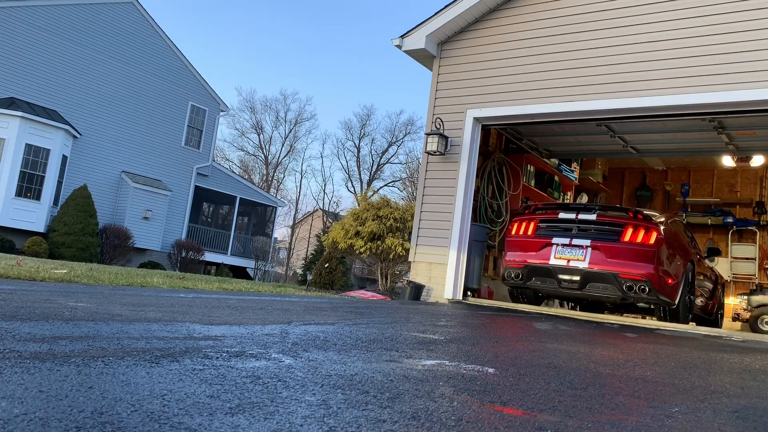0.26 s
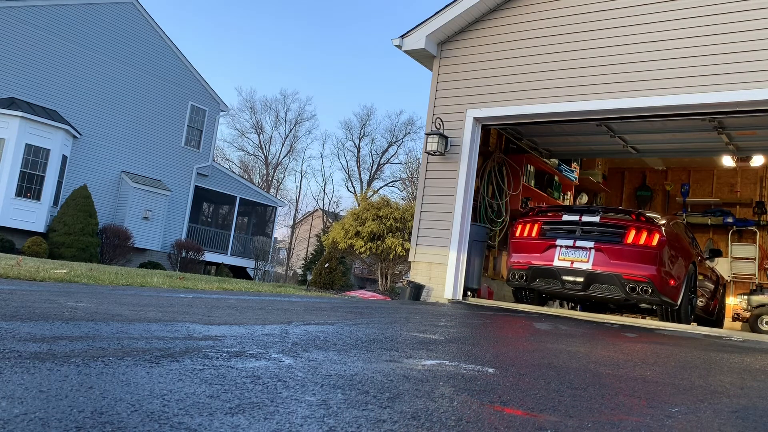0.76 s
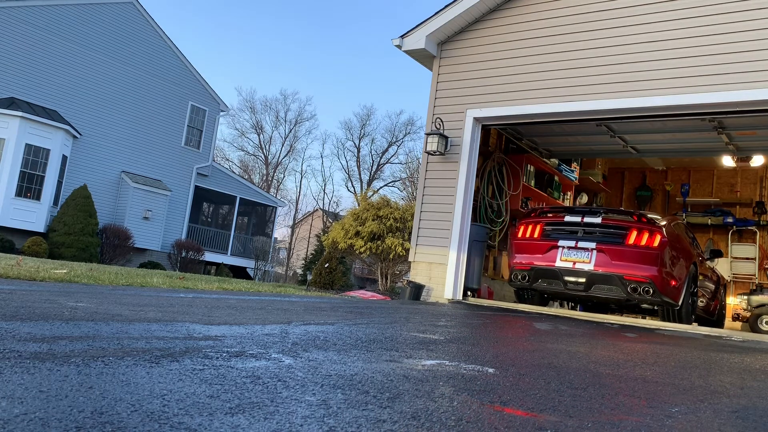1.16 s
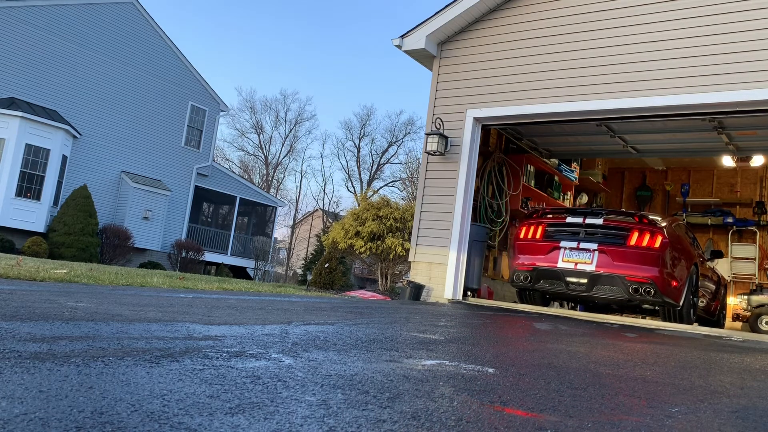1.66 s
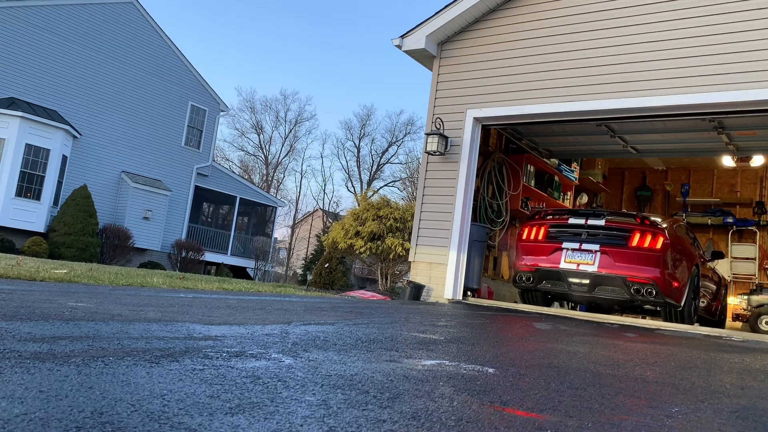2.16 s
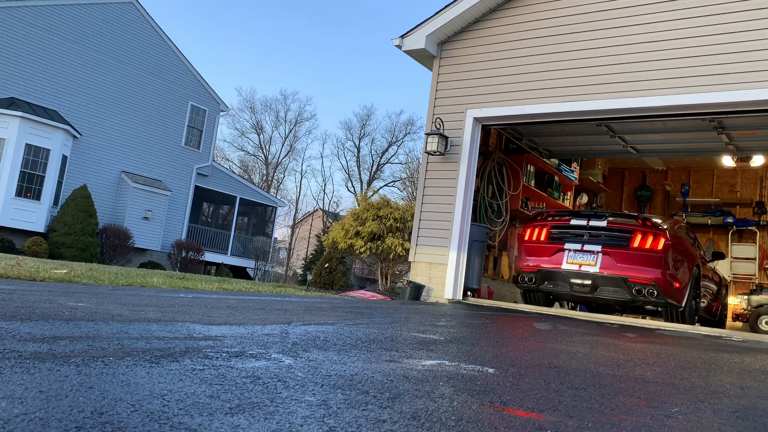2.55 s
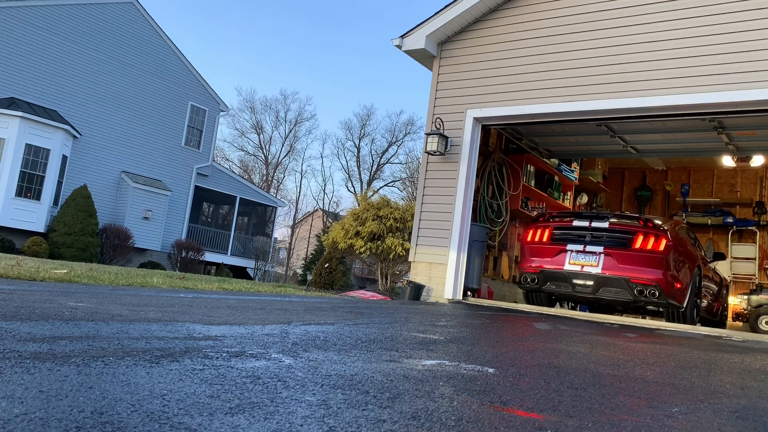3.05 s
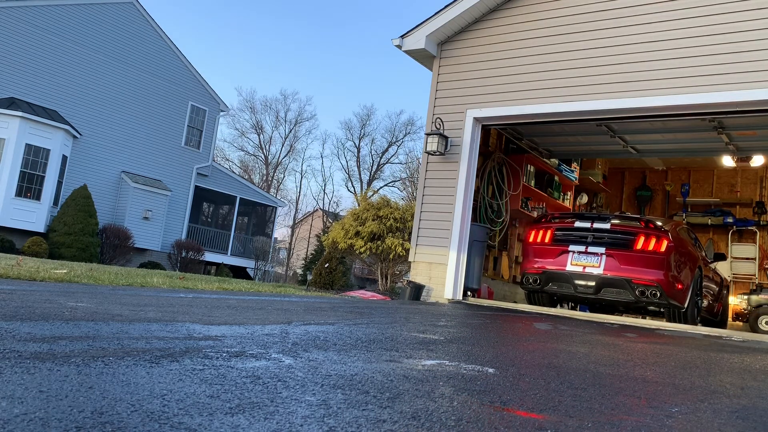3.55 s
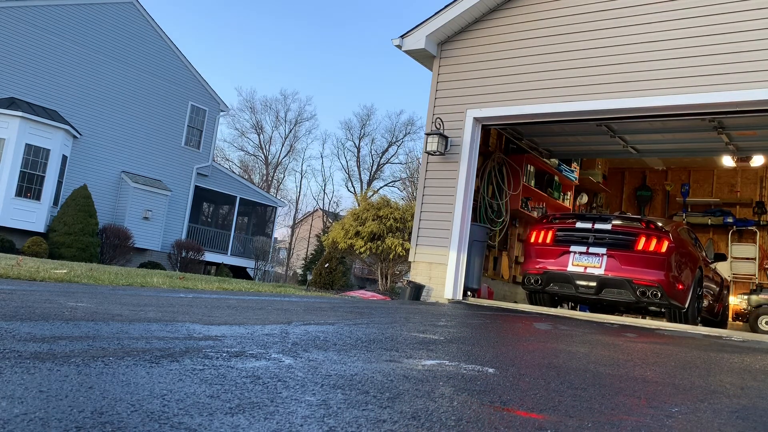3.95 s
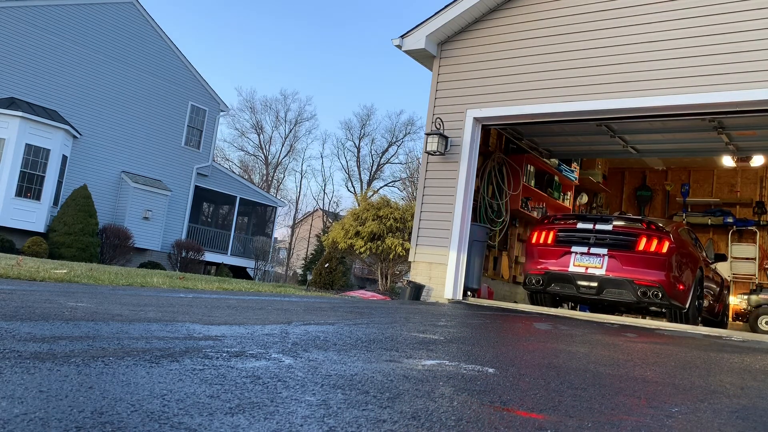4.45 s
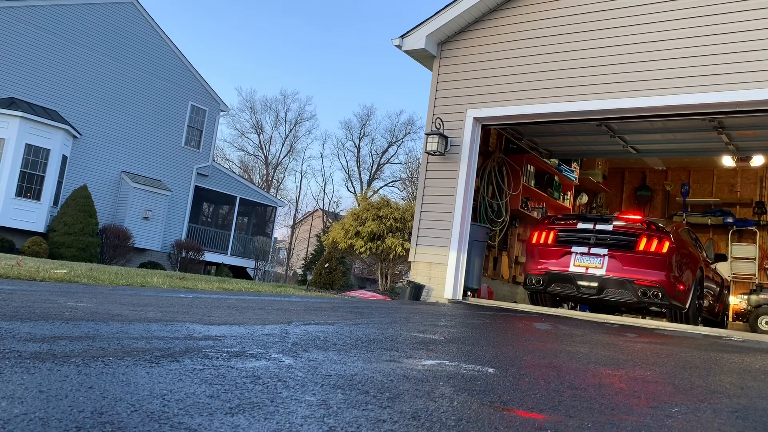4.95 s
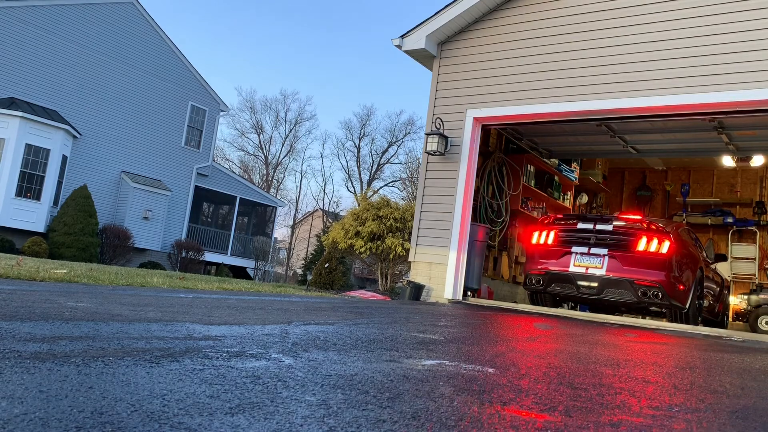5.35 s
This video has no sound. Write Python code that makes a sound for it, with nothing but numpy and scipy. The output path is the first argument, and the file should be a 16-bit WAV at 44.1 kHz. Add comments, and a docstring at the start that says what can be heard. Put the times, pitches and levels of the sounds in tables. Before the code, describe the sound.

Throaty V8 exhaust rumbles from an open garage, two throttle blips crackle, then an uneven idle continues over steady fan whir.

```python
"""A V8 car creeps out of an open garage: its revs fall, the throttle blips twice with pops in the pipe,
then it settles to a lumpy idle. Uneven firings ring the pipes, the tailpipe and the garage air.
From the start a cooling fan whirs with throbbing whistles and nears, over a street's low hum.
A loose part buzzes harder as the rasp rises; a phone hears it all through two ports."""
import sys
import numpy as np
from scipy import signal
from scipy.fft import rfft, irfft, next_fast_len
from scipy.io import wavfile
from scipy.ndimage import uniform_filter1d

SR = 44100
rng = np.random.default_rng(int(sys.argv[2]) if len(sys.argv) > 2 else 0)


def digitize_waveform(pressure):
    """Quantize a signal to 16-bit integers and store it at the path in sys.argv[1].

    Rows of a 2-D input are taken as channels; values are limited to [-1, 1].
    """
    field = np.atleast_2d(pressure).T
    bounded = np.clip(field, -1, 1)
    quanta = np.round(bounded * 32767).astype(np.int16)
    wavfile.write(sys.argv[1], SR, quanta)


N = 246519
TIME = np.arange(N) / SR
RUN_IN = SR // 3  # samples of mirrored sound that set resonances and echoes going before the start
BUILD_UP_S = 0.023  # the gas leads the ringing that it builds up


def undb(db):
    """dB to gain."""
    return 10 ** (np.asarray(db) / 20)


def level(x, db):
    """Scale to an rms level."""
    return x * undb(db) / np.sqrt(np.mean(x ** 2))


def follow(table, at):
    """Straight-line automation: every column after the first, read at the given positions."""
    points, *columns = np.transpose(table)
    return [np.interp(at, points, column) for column in columns]


def ring(x, modes):
    """Steep resonances (each applied twice) of alternating sign."""
    x = np.pad(x, (RUN_IN, 0), "reflect")
    out = 0
    for k, (hz, width_hz, db) in enumerate(modes):
        b, a = signal.iirpeak(hz, hz / width_hz, SR)
        rung = signal.lfilter(b, a, signal.lfilter(b, a, x))
        out = out + (-1) ** k * undb(db) * rung
    return out[RUN_IN:]


def driven(x, db, modes):
    """Resonances rung by a drive whose strength changes, so they build up and ring out."""
    return ring(x * undb(db), modes) / np.std(ring(x, modes))


def coloured(spectrum):
    """Noise of rms 1 with the given spectrum."""
    hz, db = np.transpose(spectrum)
    log_hz = np.log(np.fft.rfftfreq(N, 1 / SR) + 1)
    shape = undb(np.interp(log_hz, np.log(hz), db, -90, -90))
    return level(irfft(rfft(rng.standard_normal(N)) * shape, N), 0)


def walk(rate_hz):
    """Random levels held 1 / rate s and slewed twice; spread near 1."""
    hold = int(SR / rate_hz)
    steps = np.repeat(rng.standard_normal(N // hold + 1), hold)
    return 1.46 * uniform_filter1d(uniform_filter1d(steps, hold), hold)[:N]


def puffs(clicks, decay_s):
    """Envelope that jumps at each click and dies away."""
    return signal.lfilter([1], [1, -np.exp(-1 / (decay_s * SR))], clicks)


def street_hum():
    """Low street noise, nearly the same at both ears."""
    # street spectrum: pitch_hz [Hz], density_db [dB per Hz, relative]
    street_spectrum = [(15, -33), (25, -18), (42, -8.5), (66, -3.5), (113, -26), (192, -18.5), (338, -25),
                       (528, -40), (659, -41), (730, -51), (1500, -51), (1950, -85), (3300, -120)]
    each_ear = np.array([coloured(street_spectrum), coloured(street_spectrum)])
    return level(each_ear * 0.07 + coloured(street_spectrum), -42.5)


def firings(fired, rough, scatter_db, jitter):
    """One click per cylinder, with its own strength and timing plus chance that grows with roughness."""
    # the cylinders in firing order: strength_db [dB], late [share of a firing gap]
    cylinders = [(5.5, 0.0185), (2.4, 0.107), (-1, 0.0157), (5.26, -0.1016), (2.8, -0.015), (1.4, 0.087),
                 (4.5, -0.0092), (3.5, -0.1058)]
    k = np.arange(1, int(fired[-1]))
    chance = rng.standard_normal((len(k), 2)) * np.interp(k, fired, rough)[:, None]
    strength_db, late = np.array(cylinders)[k % 8].T
    at = np.interp(k + late + jitter * chance[:, 0], fired, np.arange(N)).astype(int)
    clicks = np.zeros(N)
    clicks[at] = undb(strength_db + scatter_db * chance[:, 1])
    return clicks


def boom(hz, fired, load_db):
    """Pure tone at the firing rate, lifted by the garage air and trailing the firings as revs rise."""
    # how much the garage lifts the boom: firing_rate_hz [Hz], lift_db [dB over the load]
    garage_lift = [(44, -2), (46, 0.5), (48, 1.5), (49.5, 9.5), (51, 16), (53, 20.5), (55.5, 18),
                   (57, 13.5), (60, 5), (63, -3), (67, 8.5), (70, 5), (73, 8)]
    lag_rad_per_hz, in_step_hz = .031, 48
    garage_swell_s = 0.019  # the garage air takes this long to follow
    lift_db, = follow(garage_lift, hz)
    swell = uniform_filter1d(undb(load_db + lift_db), int(garage_swell_s * SR))
    lag = lag_rad_per_hz * (hz - in_step_hz)
    return swell * np.sqrt(2) * np.cos(2 * np.pi * fired - lag)


def lope(drive, pops):
    """Garage air modes rung by the uneven beat between firings, and thumped by the pops."""
    # garage air modes: pitch_hz [Hz], width_hz [Hz, of one pass], level_db [dB, relative]
    garage_modes = [(54, 6.7, 2), (62.3, 6, 7), (78.7, 15.7, -4)]
    # ride of the uneven lope: start_s [s], level_db [dB]
    lope_ride = [(0, -35), (.35, -49), (.55, -53), (1.3, -46), (1.45, -48), (2.5, -36), (2.7, -32),
                 (2.9, -56.5), (3.25, -44.5), (3.4, -31.5), (3.8, -33), (4.0, -35), (4.4, -25.5),
                 (4.6, -46), (5.3, -36.5), (5.45, -33.5), (5.59, -53)]
    lope_db, = follow(lope_ride, TIME + BUILD_UP_S)
    pop_thump_db = -46.5
    return driven(drive, lope_db, garage_modes) + driven(pops, pop_thump_db, garage_modes)


def pipe_growl(drive, growl_db):
    """Exhaust pipe and garage resonances rung by the firings."""
    # pipe and garage resonances: pitch_hz [Hz], width_hz [Hz, of one pass], level_db [dB, relative]
    pipes = [(95.1, 11, -5), (129.36, 11.8, 4), (145.6, 18.6, 0.5), (178.2, 18.6, -6), (195.9, 18.6, -8),
             (234.5, 23.1, -6.5), (270, 21.4, -14), (290.5, 29, -11.5)]
    return driven(drive, growl_db, pipes)


def exhaust_gas(clicks, drive):
    """Gas hisses in a puff after each firing, on top of the firings themselves."""
    hiss = (puffs(clicks, 0.0071) + 0.071) * rng.standard_normal(N)
    return level(hiss, -1) + drive


def tailpipe_bark(gas, tips_db, fired, load_db):
    """Tailpipe resonances rung by gas puffs; the lowest two swell once an engine cycle at light load."""
    # tailpipe resonances: pitch_hz [Hz], width_hz [Hz, of one pass], level_db [dB, relative]
    tips = [(345.3, 49.4, -4.5), (370.3, 40.3, -3), (423.6, 35, -3), (439, 29, 6), (505, 75, -3.5),
            (556, 19, -11), (620.4, 73, -2.5), (657, 11, -6)]
    full_depth, start_cycles = 0.92, 0.78
    full_below_db, lost_per_db = -44.5, 1.3  # above this load the swell evens out
    over_db = np.maximum(load_db - full_below_db, 0)
    depth = np.clip(full_depth - lost_per_db * over_db, 0, 1)
    throb = 1 + depth * np.cos(2 * np.pi * (fired / 8 - start_cycles))  # eight firings a cycle
    low_tips = driven(gas * throb, tips_db - 3.0, tips[:2])
    high_tips = driven(gas, tips_db - 11.5, tips[2:])
    return low_tips + high_tips


def tailpipe_rasp(gas, rasp_db):
    """Higher resonances that hard-driven gas rings, flickering in level."""
    # rasp resonances: pitch_hz [Hz], width_hz [Hz, of one pass], level_db [dB, relative]
    rasp_modes = [(725, 140, -0.5), (815.5, 70, -0.5), (911, 120, -3.5), (1048, 76, -4.5), (1109, 85, -3),
                  (1284.1, 160, -10)]
    return driven(gas * undb(2.4 * walk(30.05)), rasp_db, rasp_modes)


def loose_part(clicks, rasp_db):
    """A loose part chatters at each firing, ever harder as the rasp grows."""
    # bright buzz spectrum: pitch_hz [Hz], density_db [dB per Hz, relative]
    buzz_spectrum = [(8800, -24), (9600, -6), (11200, -14.5), (12600, -12.5), (13400, -17.5),
                     (14600, -11.5), (15700, -14)]
    buzz_db, per_rasp_db, from_rasp_db = -71, 1.1, -52  # buzz level when the rasp is at from_rasp_db
    chatter = puffs(clicks * undb(3.1 * walk(110)), 0.0077) + 0.2
    buzz = level(chatter * coloured(buzz_spectrum), 0)
    return buzz * undb(buzz_db + per_rasp_db * (rasp_db - from_rasp_db))


def fuel_pops():
    """Unburnt fuel pops in the pipe as the throttle snaps open or shut: single clicks."""
    # pops: start_s [s], strength_db [dB over a firing]
    pop_list = [(1.423, 4), (1.533, 1.5), (1.546, 1.5), (1.655, 1), (2.683, 3), (2.749, -0.5), (2.819, 8)]
    pops = np.zeros(N)
    for start_s, strength_db in pop_list:
        pops[int(start_s * SR)] = undb(strength_db)
    return pops


def engine():
    """Firings and pops drive every resonance of the car; returns bass, bark with rasp, and buzz."""
    # throttle ride: start_s [s], firing_rate_hz [Hz], load_db [dB]
    throttle = [(0.0, 72.6, -41.5), (0.14, 71.04, -40), (0.3, 62.35, -59.5), (0.542, 55.76, -49),
                (0.99, 47.85, -47), (1.102, 48.54, -48.5), (1.329, 54.43, -41), (1.441, 67.54, -32),
                (1.531, 72.2, -28), (1.641, 70.71, -29), (1.799, 66.17, -43.5), (1.952, 68, -47),
                (2.178, 71.47, -33.5), (2.52, 73.46, -35.5), (2.61, 68.32, -39), (2.691, 64.8, -28),
                (2.78, 59.43, -32.5), (2.842, 56.18, -39.5), (3.1, 52.98, -43), (3.327, 48.88, -46.5),
                (3.619, 45.67, -42), (3.822, 44.23, -43), (4.142, 49.24, -30.5), (4.321, 47.55, -31.5),
                (4.48, 44, -36), (4.68, 47.21, -35.5), (5.042, 47.83, -31.5), (5.59, 48.56, -33)]
    # exhaust ride: start_s [s], growl_db [dB], bark_db [dB, before the trims of the tailpipe notes]
    exhaust_ride = [(0.0, -40.5, -46.5), (0.398, -46.5, -57.5), (1.03, -59.5, -57), (1.14, -44.5, -57.5),
                    (1.249, -47, -49.5), (1.401, -37, -48.5), (1.521, -29.5, -38), (1.7, -33.5, -45.5),
                    (1.91, -41, -52.5), (2.1, -36, -46.5), (2.181, -34.5, -41), (2.55, -32.5, -43),
                    (2.611, -45, -49.5), (2.68, -31, -46), (2.798, -39, -47), (2.988, -44.5, -50.5),
                    (3.61, -48, -47), (3.74, -39, -47.5), (4.0, -35, -44.5), (4.2, -30.5, -41.5),
                    (4.5, -35.5, -43.5), (4.67, -31.5, -42.5), (5.59, -31, -41)]
    # ride of the rasp: start_s [s], level_db [dB]
    rasp_ride = [(0, -64.5), (.4, -71.5), (1.2, -74), (1.39, -58.5), (1.425, -58), (1.46, -54), (1.53, -50),
                 (1.6, -56.5), (1.66, -52), (1.78, -61), (1.9, -67), (2.1, -61.5), (2.2, -56.5),
                 (2.35, -58), (2.46, -60.5), (2.54, -55), (2.63, -63.5), (2.685, -54), (2.73, -58.5),
                 (2.83, -69.5), (3.0, -67.5), (3.7, -73.5), (4.2, -59.5), (4.5, -67), (5.59, -61)]
    hz, load_db = follow(throttle, TIME)
    growl_db, tips_db = follow(exhaust_ride, TIME + BUILD_UP_S)
    rasp_db, = follow(rasp_ride, TIME)
    fired = np.cumsum(hz) / SR  # firings so far
    rough_below_hz, rough_per_hz = 50, .35  # a slow engine fires less evenly
    rough = 1 + rough_per_hz * np.maximum(rough_below_hz - hz, 0)
    pops = fuel_pops()
    clicks = firings(fired, rough, scatter_db=.6, jitter=.006) + pops
    turbulence = undb(-25) * rng.standard_normal(N)
    drive = level(clicks, 0) + turbulence
    gas = exhaust_gas(clicks, drive)
    bass = boom(hz, fired, load_db) + lope(drive, pops) + pipe_growl(drive, growl_db)
    bark = tailpipe_bark(gas, tips_db, fired, load_db) + tailpipe_rasp(gas, rasp_db)
    return bass, bark, loose_part(clicks, rasp_db)


def fan():
    """Rushing air plus whistles that throb with the blades, rising steadily as the fan nears."""
    # rushing air spectrum: pitch_hz [Hz], density_db [dB per Hz, relative]
    fan_air = [(350, -35.5), (600, -3.5), (1110, -9), (1430, -12.5), (1560, -10), (1640, -8.5),
               (1880, -11.5), (2060, -10), (2400, -13.5), (2620, -11.5), (2780, -19), (3070, -14),
               (4170, -19.5), (5260, -25.5), (5850, -22.5), (6380, -27), (7010, -24), (8610, -53),
               (10100, -33.5), (12100, -44.5), (13500, -61), (14500, -51.5), (15700, -41)]
    # whistles: pitch_hz [Hz], width_hz [Hz, of one pass], level_db [dB against the air],
    # throbs [per turn], depth [0-1], start [turns]
    whistles = [(4174, 510, -17.5, 1, 1, 0.068), (5400, 770, -17.5, 1, 1, 0.95),
                (7007, 340, -18, 2, 0.8, 0.4), (1647, 160, -9, 0.52, 0.3, 0.18)]
    turns_hz, start_db, nears_db_per_s = 16.5, -62.5, 2
    out = coloured(fan_air) * undb(0.82 * walk(12))
    turns = turns_hz * TIME + 0.017 * walk(0.92)
    for hz, width_hz, db, throbs, depth, start in whistles:
        swell = 1 + depth * np.cos(2 * np.pi * throbs * (turns - start))
        whistle = ring(rng.standard_normal(N), [(hz, width_hz, 0)])
        out = out + level(swell * whistle * undb(1.8 * walk(25)), db)
    return level(out, 0) * undb(start_db + nears_db_per_s * TIME)


def garage(x):
    """A decaying tail without deep bass, different at each ear; it changes as the car creeps along."""
    t60_s, shifts_s = .32, .25
    t = np.arange(SR // 2) / SR
    hop = int(shifts_s * SR)
    x = np.pad(x, (RUN_IN + hop, 2 * hop), "reflect")
    out = np.zeros((2, len(x) + len(t)))
    fade = np.sin(np.pi * np.arange(2 * hop) / (2 * hop))
    decay = undb(-60 * t / t60_s) * (t > .004)  # a short gap before the tail
    for start in range(0, len(x) - 2 * hop, hop):  # overlapping stretches, each with a fresh tail
        tail = level(rng.standard_normal((2, len(t))) * decay, 0) / np.sqrt(len(t))
        stretch = x[start:start + 2 * hop] * fade
        heard = signal.fftconvolve(stretch[None], tail, axes=1)
        out[:, start:start + heard.shape[1]] += heard
    out = signal.sosfilt(signal.butter(4, 330, "high", fs=SR, output="sos"), out)
    return out[:, RUN_IN + hop:RUN_IN + hop + N]


def ports(x):
    """Two ports on the phone's body: each pitch reaches them with its own lead and shading."""
    # phase between the ports: pitch_hz [Hz], left_lead_rad [radians]
    port_phase = [(0, 0), (130, -.15), (260, -.1), (350, -.55), (450, .4), (650, .1), (900, -1.6),
                  (1460, -1.9), (2240, .1), (5800, 10.7), (6300, 12), (7400, 11), (9470, 9.1), (11700, 6.3),
                  (15000, 0)]
    # level between the ports: pitch_hz [Hz], left_minus_right_db [dB]
    port_pan = [(60, 1), (110, 2), (200, -0.5), (380, 5.5), (700, 5), (1290, -2.5), (2380, 2), (4400, -4),
                (8120, -3.5), (15000, 2)]
    size = next_fast_len(N + SR // 2)
    hz = np.fft.rfftfreq(size, 1 / SR)
    lead_rad, = follow(port_phase, hz)
    pan_hz, pan_db = np.transpose(port_pan)
    shading_db = np.interp(np.log(hz + 1), np.log(pan_hz), pan_db)
    half = undb(shading_db / 2) * np.exp(.5j * lead_rad)  # each port takes half the difference
    spectrum = rfft(x, size)
    return irfft([spectrum * half, spectrum / half], size)[:, :N]


def scene():
    """The car direct and via the garage, over the street's hum."""
    bass, bark, buzz = engine()
    whir = fan()
    echo = undb(-5.5) * garage(whir + undb(5.0) * bark + undb(8.5) * bass)
    return ports(bass + bark + whir + buzz) + echo + street_hum()


def record(dry):
    """The phone cuts the deep bass and the top."""
    low_cut_hz, top_hz = 41, 15750
    dry = signal.sosfilt(signal.butter(6, low_cut_hz, "high", fs=SR, output="sos"), dry)
    return signal.sosfilt(signal.ellip(10, .2, 80, top_hz, fs=SR, output="sos"), dry)


dry = scene()
out = record(dry)
digitize_waveform(out)
```